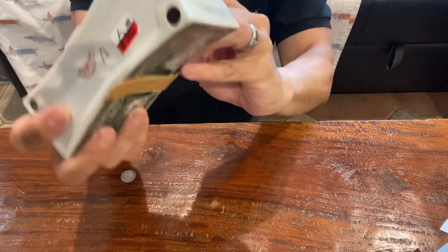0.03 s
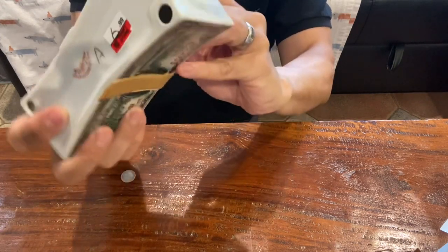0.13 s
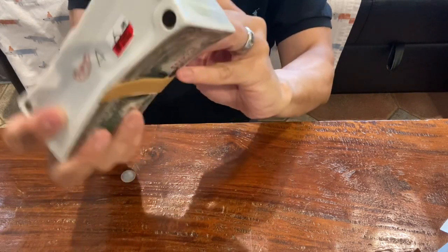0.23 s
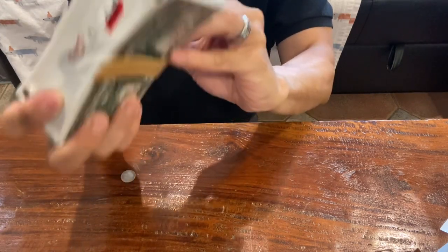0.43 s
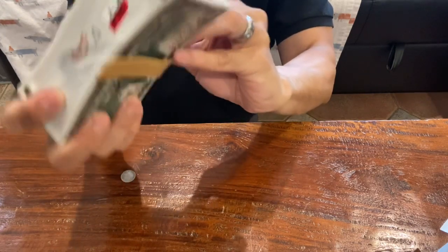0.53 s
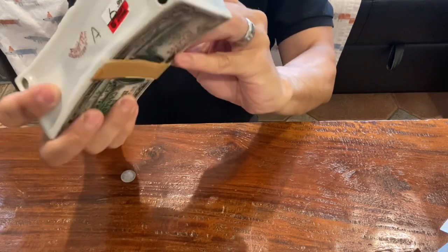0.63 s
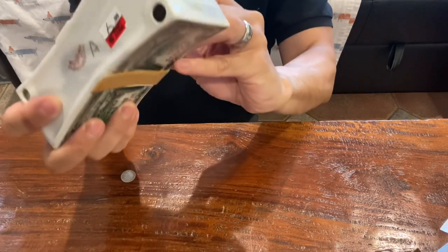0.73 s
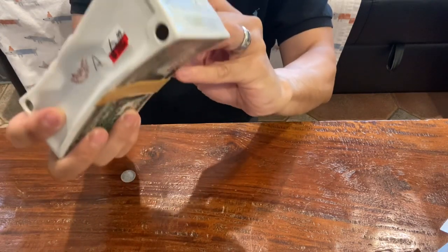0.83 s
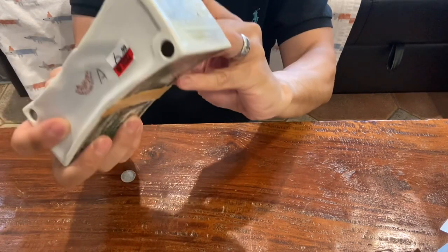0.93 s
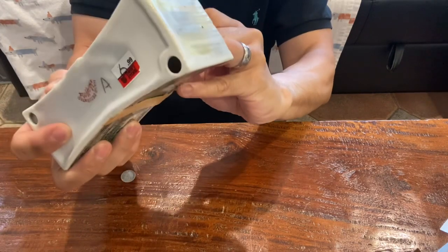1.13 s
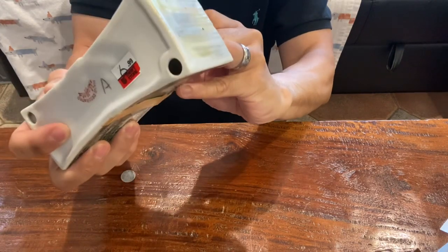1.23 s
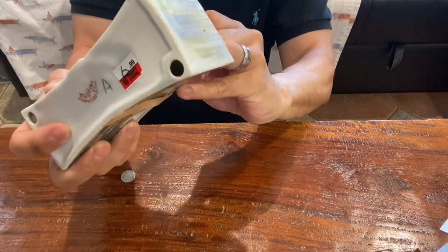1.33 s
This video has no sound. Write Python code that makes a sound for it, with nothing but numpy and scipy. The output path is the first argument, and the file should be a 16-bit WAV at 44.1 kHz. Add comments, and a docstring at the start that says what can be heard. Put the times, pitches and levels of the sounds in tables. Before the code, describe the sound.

Bright metallic clatter of a few coins in a tilted coin bank, then light taps.

```python
"""A few coins slide and clatter in a hard coin bank, tilted by hand over a wooden table in a small room.
Each contact is a bright clash plus the ring of coins and shell; the table thumps softly as the bank moves.
The coins settle, a few dry taps and finger rubs on the shell follow, and a faint room hum remains."""
import sys
import numpy as np
from scipy import signal
from scipy.fft import rfft, irfft, next_fast_len
from scipy.io import wavfile
from scipy.ndimage import uniform_filter1d, map_coordinates

SR = 44100
rng = np.random.default_rng(int(sys.argv[2]) if len(sys.argv) > 2 else 0)


def wav_out(sig):
    """Save sig, one row per channel (or a flat mono array), as 16-bit PCM at SR to the path in sys.argv[1]."""
    wavfile.write(sys.argv[1], SR, np.round(np.clip(np.atleast_2d(sig).T, -1, 1) * 32767).astype(np.int16))


N = 61739
T = np.arange(int(SR * .7)) / SR  # time axis of one event, s

# coin-on-coin noise: freq_hz, level_db
CLASH_SPECTRUM = [(500, -40), (1500, -27.5), (3000, -24.5), (5000, -7), (6100, -6), (6500, -5), (7200, 1.5),
                  (9300, -5), (10200, -17), (11200, -22.5), (12000, -3), (13000, -5), (14700, -18),
                  (15400, -14.5), (15900, -31), (16500, -46.5)]


def coins():
    """Each contact clashes, rings the coins and knocks the shell; the main ring swells to a crest."""
    # start_s, clash_db, main_db, low_db, knock_db, rise_s (short: struck, long: sliding), coin_size
    contacts = [(.001, -52.5, -49.5, -47.5, -58, 0.0027, "small"),
                (.03, -60, -53.5, -61, -68.5, .008, "large"),
                (.066, -53, -45.5, -57.5, -74.5, 0.0054, "small"),
                (0.0956, -48, -43, -48.5, -50.5, 0.001, "small"),
                (0.126, -76, -57.5, -58.5, -80, 0.0017, "large"),
                (0.1596, -48, -44.5, -62, -51, 0.00041, "small"),
                (0.187, -55.5, -45.5, -67.5, -57.5, 0.00055, "small"),
                (0.2067, -38, -32, -41.5, -37, 0.00011, "small"),
                (0.2281, -33, -25.5, -61.5, -41.5, 0.0001, "small"),
                (0.235, -43.5, -39.5, -58, -46, 0.00075, "large"),
                (0.262, -56.5, -47.5, -73, -54, 0.0023, "small"),
                (.267, -46.5, -46.5, -65, -51, 0.0016, "small"),
                (0.3289, -38, -35.5, -61, -51.5, 0.0009, "small"),
                (0.338, -53, -35.5, -55.5, -66, 0.00072, "large"),
                (0.3451, -29.5, -24.5, -38, -40.5, 0.0009, "large"),
                (0.361, -55, -32, -38, -48.5, 0.001, "small"),
                (0.372, -42.5, -46, -39.5, -47.5, 0.00067, "large"),
                (0.3787, -35.5, -29, -41, -39, 0.00043, "small"),
                (0.387, -40, -40, -47, -39.5, .001, "large"),
                (0.4451, -27.5, -16, -59.5, -45.5, 0.00011, "small"),
                (0.4599, -20, -10.5, -40, -32.5, 0.00071, "small"),
                (0.4744, -30.5, -14.5, -52.5, -48.5, 0.00054, "small"),
                (0.5042, -62.5, -53, -32.5, -58.5, .0006, "large"),
                (.536, -32.5, -21.5, -60, -49, .0003, "small"),
                (0.5525, -23, -26.5, -19, -21.5, 0.00018, "small"),
                (0.5682, -25, -17, -35, -47, 0.00047, "large"),
                (0.5797, -36, -23, -32.5, -36.5, 0.0012, "large"),
                (0.5863, -34.5, -20.5, -48, -30.5, 0.00028, "small"),
                (0.663, -61, -50, -58, -40, 0.00037, "small")]
    # modes rung by every clash: pitch_hz; level_db; t60_s
    bright_hz = [6020, 6148, 7140, 7745, 8060, 8480, 8530, 9302, 9930, 10900, 11850, 12700, 13105, 13800,
                 15455]
    bright_db = [-12.5, -17.5, -25, -17, -25.5, -6.5, -31, -5, -33.5, -34.5, -21, -5.5, -19.5, -16.5, -22]
    bright_t60_s = [.1, 0.31, .35, .07, 0.045, 0.06, .25, 0.074, 0.11, .08, 0.23, 0.044, 0.076, .12, .17]
    # flat-landing modes by coin_size, close pairs beat: pitch_hz; level_db; t60_s
    flat_hz = {"small": [4400, 4418, 4440, 5120, 5770, 6812, 6850], "large": [3835, 3860, 3895, 6030]}
    flat_db = {"small": [-3, -12, -15, -15, -13, -3, -22], "large": [-6, -21, -21, -11]}
    flat_t60_s = {"small": [.055, .5, .45, .05, .05, .06, .4], "large": [.05, .35, .45, .12]}
    # knock on the shell: freq_hz, level_db
    knock_spectrum = [(300, -34), (700, -16), (1150, 0), (1700, -8), (2200, 0), (3200, -7.5), (4400, 13),
                      (6500, -21), (10000, -27.5), (16000, -41)]
    main_hz, shell_hz, crest_s = 7205, 1143, .0041
    swell = (T / crest_s * np.exp(1 - T / crest_s)) ** 3.5
    afterring = amp(-15) * onset(crest_s) * fade(t60_s=.08)
    shell_note = amp(-26) * fade(t60_s=.17) * np.sin(2 * np.pi * shell_hz * T)
    out = np.zeros((2, N))
    for start_s, clash_db, main_db, low_db, knock_db, rise_s, coin_size in contacts:
        clash = amp(9.5) * edge_bounces(count=4) + amp(4) * burst(CLASH_SPECTRUM, t60_s=.018)
        chatter = amp(-8) * burst(CLASH_SPECTRUM, t60_s=.085)
        bright = clash + chatter + coin_ring(bright_hz, bright_db, bright_t60_s, scatter_db=1.5)
        low = coin_ring(flat_hz[coin_size], flat_db[coin_size], flat_t60_s[coin_size], scatter_db=2.8)
        knock = burst(knock_spectrum, t60_s=.02) + shell_note
        main = (swell + afterring) * np.sin(2 * np.pi * (main_hz * T + rng.random()))
        contact = amp(clash_db) * bright + amp(low_db) * low + amp(knock_db) * knock + amp(main_db) * main
        add(out, start_s, in_room(onset(rise_s) * contact, room_db=-10.5))
    return out


def edge_bounces(count, spacing_s=.0011, loss_db=4):
    """A coin's edge bounces within milliseconds, each touch a weaker click."""
    out = np.zeros(len(T))
    for k in range(count):
        click = burst(CLASH_SPECTRUM, t60_s=2 * spacing_s)
        add(out, spacing_s * k * (.5 + rng.random()), amp(-loss_db * k) * click)
    return out


def coin_ring(pitches_hz, levels_db, t60s_s, scatter_db):
    """Damped modes, struck differently each time; touching coins disturb each other's phase."""
    waver_rad, waver_per_s = .98, 52
    out = np.zeros(len(T))
    for hz, db, t60_s in zip(pitches_hz, levels_db, t60s_s):
        waver = waver_rad * map_coordinates(rng.standard_normal(256), [T * waver_per_s], mode="wrap")
        envelope = amp(db + scatter_db * rng.normal()) * fade(t60_s)
        out += envelope * np.sin(2 * np.pi * (hz * T + rng.random()) + waver)
    return out


def shell_taps():
    """Dry taps on the held shell wake a brief hollow note in the air inside."""
    # start_s, top_db, deep_db
    taps = [(0.903, -30.5, -34.5), (1.126, -52.5, -56.5), (1.2827, -51.5, -78), (1.2851, -50, -75)]
    # bright and deep parts of a tap: freq_hz, level_db
    top_spectrum = [(1500, -32), (3000, -22), (4900, -5.5), (7000, 1.5), (9500, -4.5), (11000, -19.5),
                    (13000, 1), (16000, -34.5)]
    deep_spectrum = [(200, -32), (350, -22), (600, -23), (1300, -8), (2400, -13), (4000, -5), (8000, -32)]
    hollow_hz = 346
    hollow = amp(-13) * fade(t60_s=.17) * np.sin(2 * np.pi * hollow_hz * T)
    out = np.zeros((2, N))
    for start_s, top_db, deep_db in taps:
        deep = burst(deep_spectrum, t60_s=.012) + hollow
        top = burst(top_spectrum, t60_s=.012) + amp(-8.5) * burst(top_spectrum, t60_s=.055)
        add(out, start_s, in_room(amp(top_db) * top + amp(deep_db) * deep, room_db=-8.5))
    return out


def table_bumps(rise_s=.0065):
    """Soft bumps set the table's low modes beating."""
    # start_s, level_db
    bumps = [(.008, -45), (0.184, -32)]
    # table modes: pitch_hz, level_db, t60_s
    modes = [(45.4, -7.5, 0.4), (62.6, 1.5, 0.44), (83.8, 2.5, 0.54), (109, -11, 0.3), (129, -4, 0.17)]
    boom = sum(amp(db) * fade(t60_s) * np.sin(2 * np.pi * hz * (T - rise_s)) for hz, db, t60_s in modes)
    out = np.zeros(N)
    for start_s, db in bumps:
        add(out, start_s, amp(db) * boom * onset(rise_s))
    return out


def finger_rubs(grain_db=2.5):
    """Fingers shift on the shell in faint grainy swishes."""
    # centre_s, width_s, level_db
    strokes = [(1.12, .014, -66), (1.19, .014, -66), (1.14, .045, -70)]
    # friction noise: freq_hz, level_db
    spectrum = [(1000, -26.5), (2500, -2.5), (4500, 2), (9000, -1.5), (11000, -9), (13000, 10),
                (14500, -17), (16000, -19)]
    t = np.arange(N) / SR
    envelope = sum(amp(db) * np.exp(-.5 * ((t - s) / width_s) ** 2) for s, width_s, db in strokes)
    roughness = unit(uniform_filter1d(rng.standard_normal(N), size=120))
    grain = unit(amp(grain_db * roughness))
    return envelope * grain * np.array([noise(spectrum, N), noise(spectrum, N)])


def in_room(sound, room_db):
    """A sound from the bank plus a fresh room tail, as two microphone ports hear it."""
    # room decay: freq_hz, t60_s
    decay = [(200, 0.95), (1000, 0.65), (4000, 0.68), (8000, 0.41), (15000, .34)]
    # left port over right: freq_hz, lead_rad; freq_hz, level_db
    lead = [(1000, .4), (3920, .3), (4020, 4.2), (4400, 4.1), (4650, 3.4), (5000, 4.4), (5500, 4.8),
            (7200, 5.5), (7900, 6.3), (9300, 8), (10400, 9.4), (12000, 11.9), (13300, 12.7), (14700, 15.6),
            (16000, 15.8)]
    balance = [(1000, -2.5), (2300, 0), (3800, 0), (4400, -5), (5000, 0), (5600, -7), (6200, -1),
               (7200, -4), (7800, 0), (15000, 0)]
    bank_share = .6  # tail power arriving from the bank's direction

    def ports(hz):
        gain = amp(np.outer([.5, -.5], along(balance, hz)))
        return gain * np.exp(1j * np.outer([.5, -.5], along(lead, hz)))

    hz, t, bands = signal.stft(rng.standard_normal((3, len(T))), SR, nperseg=256)
    bands = bands * fade(along(decay, hz)[:, None], t)
    tail = signal.istft(bands, SR)[1][:, :len(T)] * onset(rise_s=.003)
    tail /= np.linalg.norm(tail[0])
    wet = amp(room_db) * signal.fftconvolve(sound[None], tail, axes=1)[:, :len(T)]
    return filtered(sound + np.sqrt(bank_share) * wet[0], ports) + np.sqrt(1 - bank_share) * wet[1:]


def room_tone(air_db=-58):
    """Low air noise with the hum and thin whine of an appliance."""
    # air noise: freq_hz, level_db; freq_hz, left_right_correlation
    spectrum = [(20, -28), (45, 0.5), (90, 1.5), (140, -6.5), (200, -5.5), (280, -12), (360, -14),
                (500, -16.5), (900, -17), (1400, -27.5), (3000, -35.5), (8000, -37.5), (15000, -64)]
    likeness = [(60, 0.61), (250, 0.35), (600, 0.11), (5000, 0.088)]
    # appliance: pitch_hz, rms_db, left_lead_rad
    tones = [(98.03, -71, .1), (199, -71.5, .3), (1001, -62, 2.583)]

    def mid_side_gains(hz):
        angle = np.arccos(along(likeness, hz)) / 2
        return np.array([np.cos(angle), np.sin(angle)])

    mid, side = filtered(np.array([noise(spectrum, N), noise(spectrum, N)]), mid_side_gains)
    out = amp(air_db) * np.array([mid + side, mid - side])
    t = np.arange(N) / SR
    for hz, db, lead_rad in tones:
        phase = 2 * np.pi * (hz * t + rng.random())
        out += amp(db) * np.sqrt(2) * np.sin([phase + lead_rad, phase])
    return out


def amp(db):
    """Decibels to gain."""
    return 10 ** (np.asarray(db) / 20)


def unit(x):
    """Scale to rms 1."""
    return x / np.sqrt(np.mean(x ** 2) + 1e-20)


def onset(rise_s):
    """Smooth rise from silence."""
    return 1 - np.exp(-(T / rise_s) ** 2)


def fade(t60_s, t=T):
    """Exponential decay, 60 dB in t60_s."""
    return np.exp(-np.log(1000) * t / t60_s)


def along(points, hz):
    """Interpolate (freq_hz, value) points on a log axis."""
    freq_hz, values = np.transpose(points)
    return np.interp(np.log(hz + 1), np.log(freq_hz + 1), values)


def filtered(x, response):
    """Apply a frequency response."""
    n = x.shape[-1]
    padded = next_fast_len(2 * n)
    return irfft(rfft(x, padded) * response(np.fft.rfftfreq(padded, 1 / SR)), padded)[..., :n]


def noise(spectrum, size):
    """Coloured noise, rms 1."""
    hz = np.fft.rfftfreq(size, 1 / SR)
    return unit(irfft(amp(along(spectrum, hz)) * np.exp(2j * np.pi * rng.random(len(hz))), size))


def burst(spectrum, t60_s):
    """Decaying coloured noise, equal energy on every draw."""
    envelope = fade(t60_s)
    return unit(noise(spectrum, len(T)) * envelope) * np.sqrt(np.mean(envelope ** 2))


def add(track, start_s, sound):
    """Mix a sound into a track."""
    part = track[..., round(start_s * SR):][..., :sound.shape[-1]]
    part += sound[..., :part.shape[-1]]


def scene():
    """Coins, hands, table and room in stereo."""
    return coins() + shell_taps() + finger_rubs() + table_bumps() + room_tone()


def record(dry):
    """Brick-wall low-pass."""
    return filtered(dry, lambda hz: hz < 16500)


dry = scene()
out = record(dry)
wav_out(out)
```